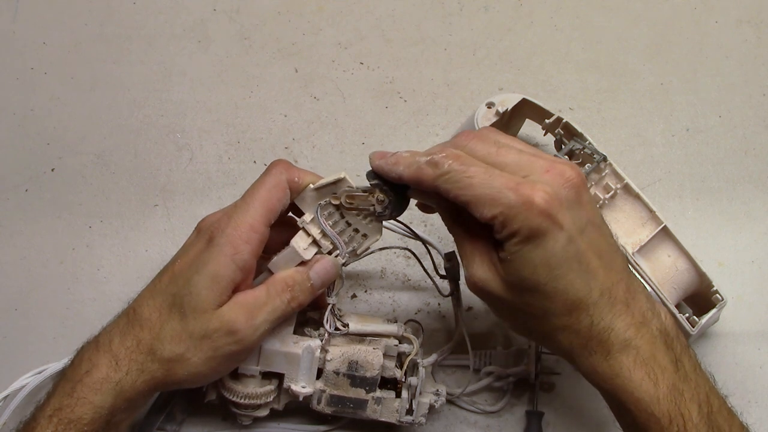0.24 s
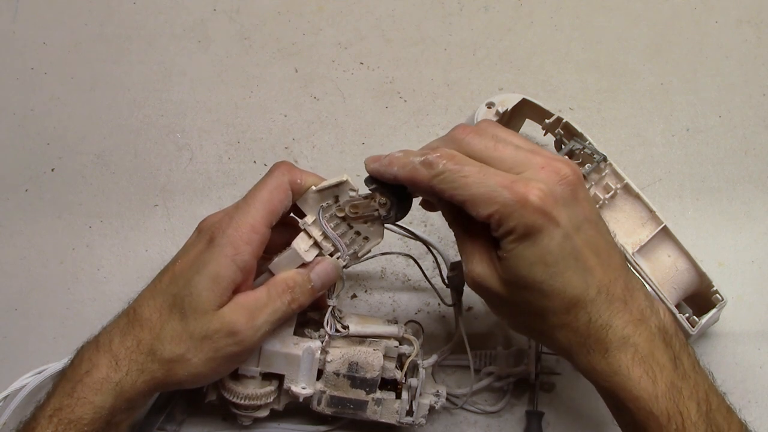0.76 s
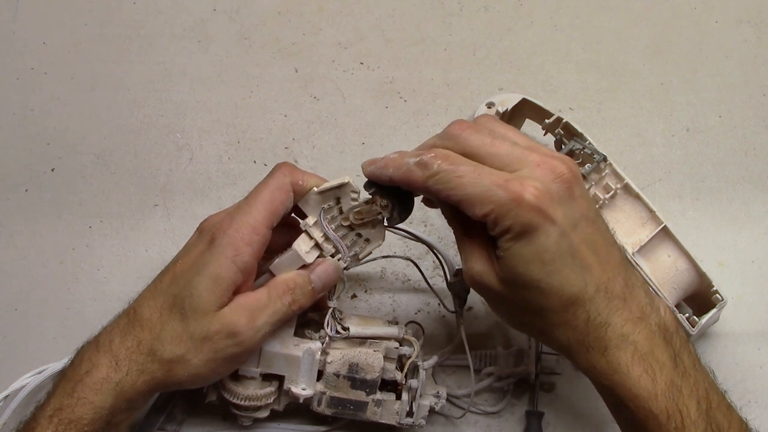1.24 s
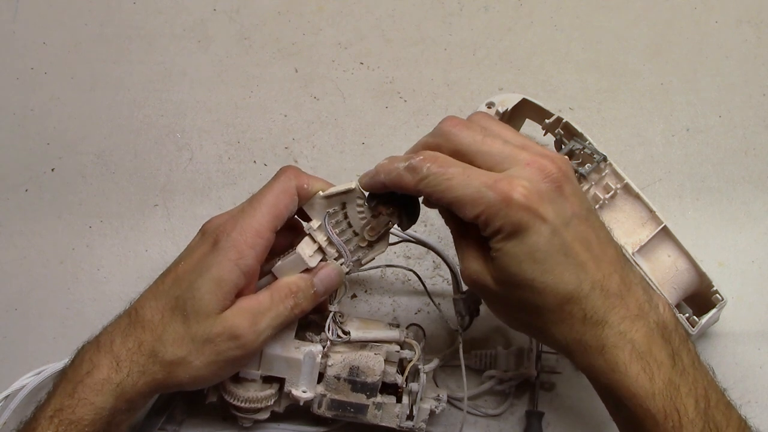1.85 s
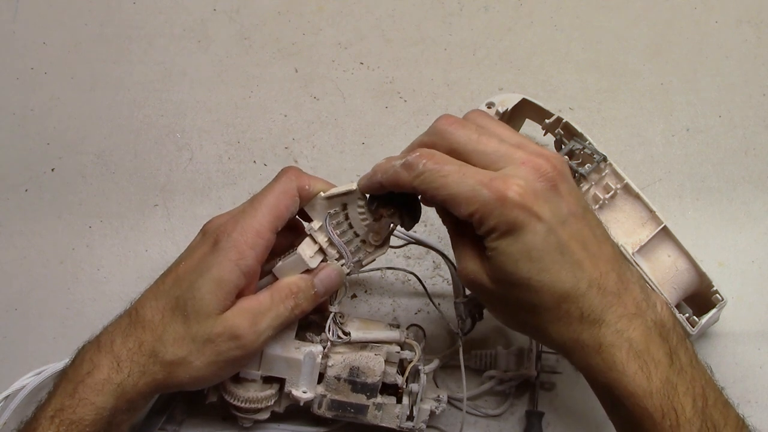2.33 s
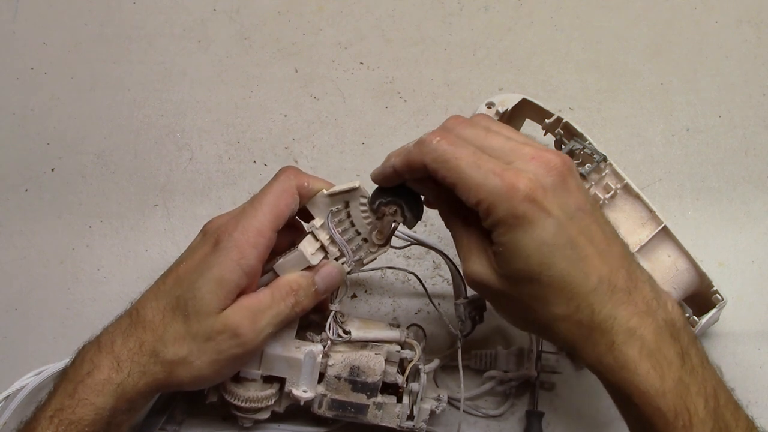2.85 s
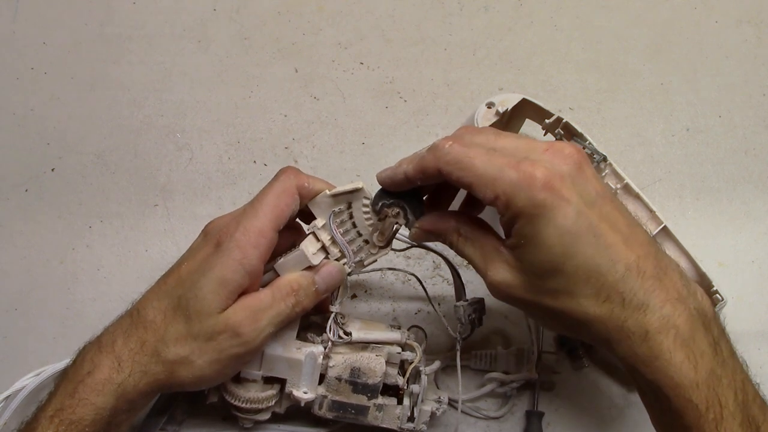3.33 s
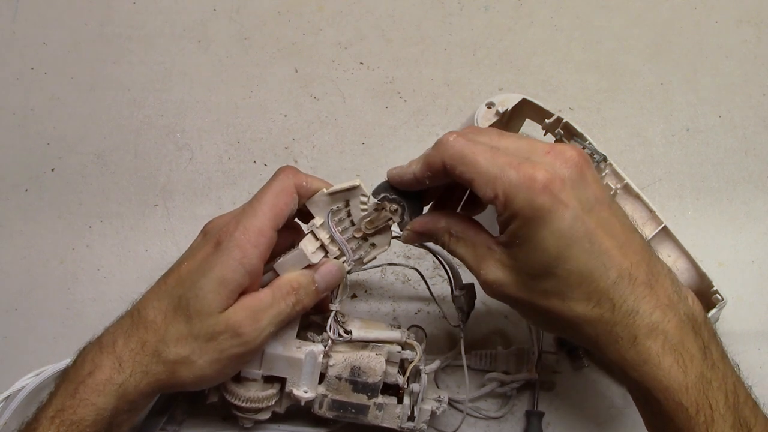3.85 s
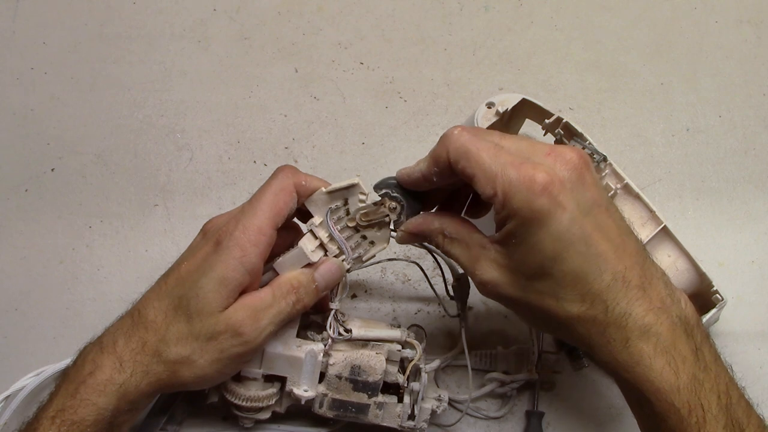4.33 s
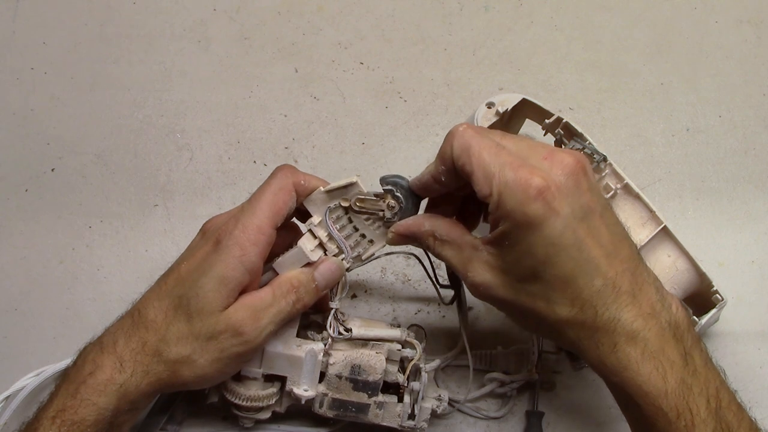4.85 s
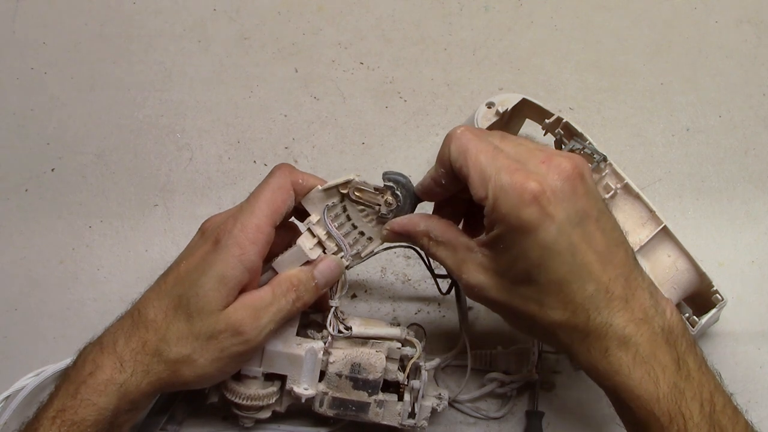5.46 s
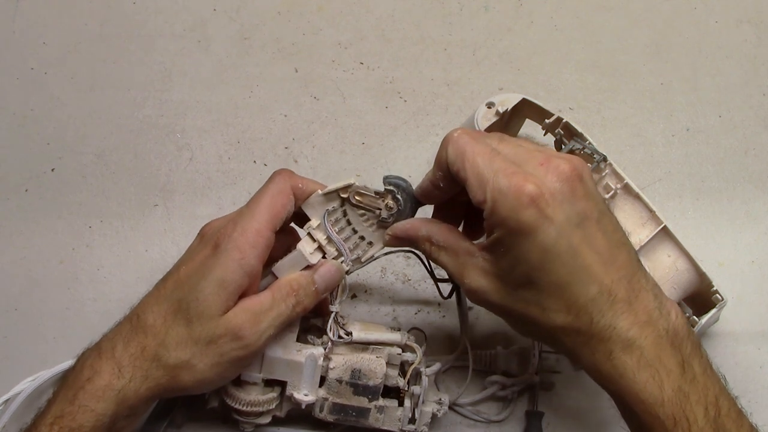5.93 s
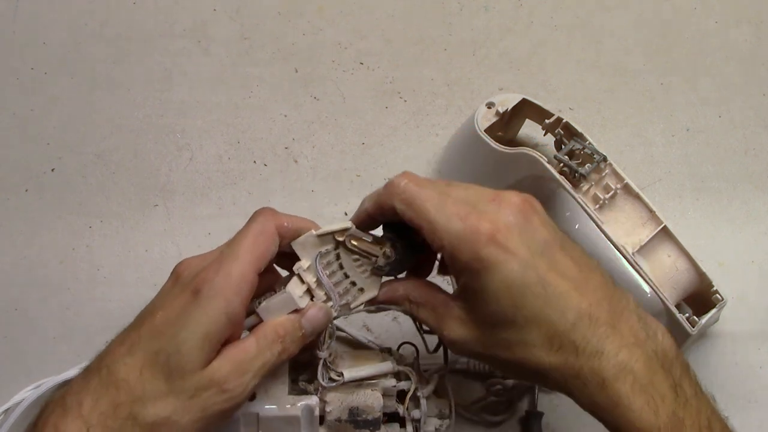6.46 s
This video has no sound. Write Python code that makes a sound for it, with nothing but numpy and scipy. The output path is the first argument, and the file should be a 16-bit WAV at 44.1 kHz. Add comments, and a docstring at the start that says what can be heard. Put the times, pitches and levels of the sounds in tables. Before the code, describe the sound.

Over the low, steady hum of a fan in a small room, a plastic selector knob clicks step by step near the microphone, some snaps crisp and slightly metallic, others barely there. A few dull bumps on a table fall between them. Toward the end come a faint squeak, hands rubbing on plastic and a cluster of knocks, one much louder than the rest, before a last light click.

```python
"""A blender's plastic rotary switch, turned by hand close to the microphone, over a work table.
Its sprung wiper scrapes over the contacts and snaps into each detent; the knob ticks and faintly squeaks.
Farther off, the opened base knocks on the table, once hard, and hands brush its housing.
A fan hums in the small room. Two closely spaced capsules give a nearly mono image."""
import sys
import numpy as np
from scipy import signal
from scipy.fft import rfft, irfft
from scipy.io import wavfile
from scipy.ndimage import uniform_filter1d

SR = 44100
rng = np.random.default_rng(int(sys.argv[2]) if len(sys.argv) > 2 else 0)


def transcribe(signal):
    """Save signal, clipped to [-1, 1], as a 16-bit WAV file at the path in sys.argv[1]."""
    frames = np.atleast_2d(signal).T
    limited = np.clip(frames, -1, 1)
    pcm = np.round(limited * 32767).astype(np.int16)
    wavfile.write(sys.argv[1], SR, pcm)


N = 294756
EVENT_T = np.arange(round(.3 * SR)) / SR  # time axis of one short sound, in seconds


def gain_of(db):
    """Decibels to gain."""
    return 10 ** (np.asarray(db) / 20)


def unit_rms(x, size=None):
    """Scales to rms 1 over the first size samples."""
    return x / np.sqrt(np.mean(x[..., :size] ** 2) + 1e-20)


def value_at(points, hz):
    """Reads a table on a log-frequency axis."""
    f, value = np.transpose(points)
    return np.interp(np.log(hz + 1), np.log(f + 1), value)


def add(mix, s, sound):
    """Adds a sound at s seconds."""
    part = mix[max(round(s * SR), 0):][:len(sound)]
    part += sound[:len(part)]


def coloured(x, colour):
    """Gives x a spectrum, at rms 1."""
    gains = gain_of(value_at(colour, np.fft.rfftfreq(len(x), 1 / SR)))
    return unit_rms(irfft(rfft(x) * gains, len(x)))


def band(x, lo_hz, hi_hz):
    """Causal band-pass, at rms 1."""
    return unit_rms(signal.sosfilt(signal.butter(2, [lo_hz, hi_hz], "band", fs=SR, output="sos"), x))


def noise(size=len(EVENT_T)):
    """White noise."""
    return rng.standard_normal(size)


def decay(t60):
    """Falls 60 dB in t60 seconds."""
    return np.exp(-np.log(1000) * EVENT_T / t60)


def ring(modes, detune, weight_db=lambda hz: 0, in_step=False):
    """Struck modes, slightly shifted from blow to blow; they start in step or with alternating sign."""
    out = 0
    for k, (hz, db, t60) in enumerate(modes):
        sign = 1 if in_step else (-1) ** k
        shifted_hz = hz * (1 + detune * rng.uniform(-0.92, 1))
        out += sign * gain_of(db + weight_db(hz)) * decay(t60) * np.sin(2 * np.pi * shifted_hz * EVENT_T)
    return out


def friction(size, grains_per_s, smooth):
    """Tiny slips of uneven size over a smooth hiss."""
    return noise(size) * (smooth + (rng.random(size) < grains_per_s / SR))


def uneven(size, depth_db):
    """A gain that wanders within some 10 ms, as friction grips and gives."""
    return gain_of(depth_db * unit_rms(uniform_filter1d(noise(size), size=400)))


# The fan's rush of air. Each row: frequency in Hz, relative level in dB.
FAN_AIR = [(20, -29), (45, -11.5), (110, -9.5), (300, -7), (480, -8.5), (700, -13), (900, -13.5),
           (1120, -16), (1600, -14), (2100, -19), (2700, -22), (4500, -24.5), (8000, -28), (16000, -40.5)]
# Its hum and faint motor whine. Each row: frequency in Hz, rms level in dB.
FAN_TONES = [(118, -71.5), (176, -71.5), (236.5, -62.5), (356, -69.5), (410.5, -64), (530, -76),
             (588, -67.5), (705, -75.5), (764.4, -72.5), (823, -74), (942, -71.5), (1357, -75),
             (1529, -71.5), (2062, -71.5), (2180, -76), (2945, -79), (3060, -71.5), (5475, -79.5),
             (5943, -77.5), (7181, -91), (7418, -81), (7827, -92), (8240, -82), (10239, -84.5)]
def fan():
    """A fan in the background of the room: rushing air and slightly wavering tones."""
    t = np.arange(N) / SR
    out = gain_of(-55.5) * coloured(noise(N), FAN_AIR)
    for hz, db in FAN_TONES:
        width_hz = 0.48 + hz * 0.0029
        drift = np.cumsum(noise(N)) * np.sqrt(2 * np.pi * width_hz / SR)
        out += gain_of(db) * np.sqrt(2) * np.sin(2 * np.pi * hz * t + uniform_filter1d(drift, size=200))
    return out


# Modes of the switch body and wiper spring. Each row: frequency in Hz, relative level in dB, t60 in seconds.
BODY_MODES = [(1450, -5.5, 0.011), (1986, -13.5, 0.041), (2415, 4.5, 0.019), (2680, 2.5, 0.011),
              (3110, 1.5, 0.025), (3590, -0.5, 0.034), (3680, 6, 0.012), (4300, -36, 0.0043)]
SPRING_MODES = [(4950, 6, 0.0063), (6300, 1, 0.012), (7380, -3.5, 0.032), (8790, -0.5, 0.02),
                (9020, -4, 0.0084), (10400, 0.5, 0.0057), (11050, -19, 0.0067), (13300, -6, .012)]
# The metal tick, heard close. Each row: frequency in Hz, relative level in dB.
TICK_COLOUR = [(200, -43), (900, 5.5), (1700, 0), (2600, 3), (4500, 9.5), (5600, -10.5), (8300, 5.5),
               (10500, 5), (12000, -19), (13500, -12), (16000, -16)]
def snap(body_db, tick_db, hz):
    """One sharp tap and a few ms of chatter ring the wiper spring and the plastic body."""
    attack = round(.004 * SR)
    tap = unit_rms(coloured(signal.unit_impulse(len(EVENT_T), idx=8), TICK_COLOUR), attack)
    body = ring(BODY_MODES, detune=0.04, weight_db=lambda f: -13 * min(abs(f - hz) / 900, 1))
    spring = unit_rms(ring(SPRING_MODES, detune=0.023), attack)
    chatter = unit_rms(coloured(noise(), TICK_COLOUR) * (decay(0.019) + .09 * decay(.08)), attack)
    # a duller, later wash of nearby reflections follows the snap
    wash = band(noise(), 600, 2800) * (decay(0.21) - decay(0.069))
    body_and_wash = unit_rms(body, attack) + 0.065 * unit_rms(wash, 5 * attack)
    metal = 0.33 * tap + 0.48 * spring + 0.52 * chatter
    return gain_of(body_db) * body_and_wash + gain_of(tick_db) * metal


# Small ticks at the microphone. Each row: start in seconds, level in dB, favoured ring in Hz.
STRAIN_TICKS = [(0.304, -52, 2730), (0.5447, -53, 3720), (.69, -53, 2610), (0.7282, -43, 2840),
                (2.083, -47.5, 2900), (2.228, -44.5, 2340), (4.757, -52.5, 2850), (5.125, -53.5, 2590)]
def strain_ticks(spring_db=-18):
    """The plastic ticks under strain; little of it reaches the spring."""
    out = np.zeros(N)
    for s, db, hz in STRAIN_TICKS:
        add(out, s, snap(db, db + spring_db, hz))
    return out


# The wiper on its contacts, heard close. Each row: frequency in Hz, relative level in dB.
WIPER_COLOUR = [(200, -11), (900, 1), (1900, -23), (2500, 6.5), (3500, -0.5), (4600, -5.5), (6300, -7.5),
                (7700, 2.5), (8600, -5.5), (9400, -11), (11300, -5.5), (12500, -19), (16000, -21)]
def wiper_scrape(run_up_s, swell_db=17, release_t60=0.051):
    """The wiper scrapes harder as it runs down toward a detent, then comes to rest."""
    t = EVENT_T - run_up_s
    push = gain_of(np.minimum(swell_db * t / run_up_s, -60 * t / release_t60))
    push *= uneven(len(t), depth_db=0.3)
    return push * coloured(friction(len(t), 2500, smooth=0.31), WIPER_COLOUR)


# Steps of the switch. Each row: snap time in seconds, body level in dB, metal tick in dB, favoured ring
# in Hz, scrape in dB, run-up in seconds, second touch's offset in seconds, its gain in dB.
DETENTS = [(0.405, -33.5, -34, 3130, -40.5, 0.024, -0.017, -11),
           (.889, -47.5, -46, 3360, -46, 0.028, -0.0076, -2),
           (1.352, -39.5, -39.5, 3030, -46, .03, -0.0077, -5),
           (1.7597, -35, -35.5, 2940, -48.5, 0.053, 0.00091, -24),
           (2.331, -54, -64, 2980, -53, 0.048, 0.0092, -6), (3.103, -79, -55, 2970, -58, 0.034, .02, 2),
           (3.4156, -46, -47.5, 2610, -51.5, .045, 0.011, 0),
           (3.728, -45, -39.5, 2680, -50, 0.038, 0.012, -5),
           (4.1143, -47, -41, 3160, -52.5, .055, .0159, -5.5),
           (4.4899, -45, -52, 3000, -54, .085, -.037, -9),
           (4.843, -31, -34, 2700, -47.5, 0.039, -0.007, -16),
           (5.1691, -32.5, -36, 2570, -55, 0.089, -0.0067, -9),
           (6.6382, -55, -43.5, 2960, -48, 0.011, 0.025, 4)]
def detents(rebound_hz=3460):
    """The wiper scrapes and snaps into each detent, catching just before or rebounding just after."""
    out = np.zeros(N)
    for s, body_db, tick_db, hz, scrape_db, run_up_s, offset_s, touch_db in DETENTS:
        add(out, s - run_up_s, gain_of(scrape_db) * wiper_scrape(run_up_s))
        add(out, s, snap(body_db, tick_db, hz))
        if offset_s < 0:  # a catch rings the body less
            touch = snap(body_db - 2.5, tick_db, hz)
        else:  # a rebound has more plastic, less metal, and rings higher
            touch = snap(body_db + 1, tick_db - 6, rebound_hz)
        add(out, s + offset_s, gain_of(touch_db) * touch)
    return out


# Modes of the base on the work table, of its hollow housing and of its stiff edges.
# Each row: frequency in Hz, relative level in dB, t60 in seconds.
TABLE_MODES = [(152.2, -6, 0.34), (225.3, -4.5, 0.18), (286.8, 0, .14), (343.3, 5, 0.082), (383, -9, 0.15),
               (434, -1.5, 0.15), (512, -7, 0.14), (571, -4, 0.15)]
HOUSING_MODES = [(680, -4, .09), (765, -2, .06), (935, -6, .13), (1002, -5, .12), (1140, 2, .14),
                 (1274, -4, .1), (1530, -6, .1), (1595, -6, .09), (1760, -9, .09), (1915, -8, .08),
                 (2020, -8, .08)]
EDGE_MODES = [(2460, -6, .07), (2610, -5, .11), (2768, -1, .11), (2930, -1, .09), (3490, -2, .07),
              (3525, -2, .09), (3880, -.5, .08), (4120, -1, .08), (4545, -6, .08), (4841, -1, .1),
              (5090, -6, .08), (5330, -9, .09), (5960, -13, .09), (6520, -10, .07), (7010, -11, .09)]
# The rattle of those edges. Each row: frequency in Hz, relative level in dB.
RATTLE_COLOUR = [(1200, -50), (2200, 2.5), (3200, 3), (4000, 4.5), (5200, -9), (5900, -7), (7900, -9.5),
                 (10000, -18.5), (13000, -25), (16000, -36)]
def blow(thud_db, clack_db, crack_db, hz):
    """A blow sets the table thudding and the housing clacking; hard edges rattle for some 10 ms."""
    attack = round(.02 * SR)
    rise_s = .0003 if clack_db > thud_db - 14 else .003  # padded nudges build up slowly
    onset = -np.expm1(-EVENT_T / rise_s)
    # where the base is pushed decides which of its modes answer
    thud = ring(TABLE_MODES, detune=0.01, weight_db=lambda f: -12 * abs(np.log2(f / hz)), in_step=True)
    thud *= -np.expm1(-EVENT_T / 0.0022)  # its mass takes a cycle to get moving
    rumble = band(noise(), 184, 500) * decay(0.34)
    thud = unit_rms(thud, attack) + .2 * unit_rms(rumble, attack)
    # small loose parts hardly move the table, and ring higher
    tilt_db = 1.1 * max(clack_db - thud_db + 8, 0)
    housing = ring(HOUSING_MODES, detune=0.0011, weight_db=lambda f: tilt_db * np.log2(f / 1000))
    burst = band(noise(), 590, 1620) * decay(0.073)
    clack = unit_rms(housing, attack) + 1.66 * unit_rms(burst, attack)
    edges = ring(EDGE_MODES, detune=0.0014)
    rattle = coloured(noise(), RATTLE_COLOUR) * (1 / (1 + (EVENT_T / 0.0061) ** 4) + .11 * decay(0.12))
    crack = 0.7 * unit_rms(edges, attack) + unit_rms(rattle, attack)
    parts = (thud_db, thud), (clack_db, clack), (crack_db, crack)
    return sum(gain_of(db) * unit_rms(part * onset, attack) for db, part in parts)


# Bumps of the base, farther from the microphone. Each row: start in seconds, table thud in dB, housing
# clack in dB, edge crack in dB, favoured thud in Hz, second foot's delay in seconds, its gain in dB.
KNOCKS = [(1.371, -37.5, -42, -63, 323, 0.022, -15), (1.784, -48.5, -72, -69, 267, 0.017, -18),
          (2.361, -49, -58, -71, 255, 0.013, -23), (3.255, -47.5, -60.5, -65, 277, .0175, -1),
          (3.7851, -61, -52.5, -59, 330, .0175, -16), (5.941, -36.5, -43, -54, 507, 0.011, -27),
          (5.949, -37, -39, -50.5, 535, 0.016, -6), (6.097, -41.5, -64, -60, 288, .024, -10),
          (6.211, -14.5, -24.5, -24, 340, .0145, -24), (6.2536, -41, -42, -43, 425, 0.025, -16),
          (6.351, -36, -49.5, -68, 298, 0.019, -15), (6.515, -40, -55, -70, 338, .035, -11),
          (6.6064, -30, -44.5, -51, 310, 0.018, -0.5), (6.653, -37, -48, -60, 280, .0175, -17)]
def knocks():
    """The base lands on one foot, then more dully on a second."""
    out = np.zeros(N)
    for s, thud_db, clack_db, crack_db, hz, delay_s, second_db in KNOCKS:
        add(out, s, blow(thud_db, clack_db, crack_db, hz))
        add(out, s + delay_s, gain_of(second_db) * blow(thud_db, clack_db - 2, crack_db - 10, hz))
    return out


def finger_ticks(count=10, start_s=2.1, end_s=4.8, db=-56, spread_db=4.5):
    """Fingers shift on the knob with a scatter of faint, dull ticks."""
    out, attack = np.zeros(N), round(.004 * SR)
    for k, (late, strength) in enumerate(rng.random((count, 2))):
        tick = unit_rms(band(noise(), 1290, 2370) * decay(0.029), attack)
        level = gain_of(db + spread_db * (2 * strength - 1))
        add(out, start_s + (end_s - start_s) * (k + late) / count, level * tick)
    return out


def wiper_creep(start_s=2.73, end_s=3.07, db=-66):
    """The wiper creeps over a contact as the turn reverses: a faint scrape that swells and fades."""
    progress = np.clip((np.arange(N) / SR - start_s) / (end_s - start_s), 0, 1)
    return gain_of(db) * np.sin(np.pi * progress) * coloured(friction(N, 2500, smooth=.27), WIPER_COLOUR)


# The knob creeping on its shaft, close by. Each row: start in seconds, length in seconds, level in dB,
# level change over the squeak in dB, starting pitch in Hz.
SQUEAKS = [(5.1727, .068, -41, -9, 3780), (5.916, .17, -53, 0.5, 3810)]
def squeaks(max_slips=16, slip_s=.0135, jitter=.25, spread_db=2.5, pitch_sag=0.045):
    """The knob sticks and slips in short rasps that excite one narrow resonance, sagging as it eases."""
    out, t = np.zeros(N), EVENT_T - EVENT_T[-1] / 2
    for start, length, db, change_db, top_hz in SQUEAKS:
        for k, (late, strength) in enumerate(rng.uniform(-1, 1, (max_slips, 2))):
            grains = friction(len(t), 2400, smooth=0.3)
            delay = slip_s * (k + jitter * late)
            if delay < length:
                hz = top_hz * (1 - pitch_sag * delay / length)
                rasp = band(grains, .95 * hz, 1.05 * hz) + 0.64 * band(grains, 510, 3800)
                level = gain_of(db + change_db * delay / length + spread_db * strength)
                add(out, start + delay + t[0], level * rasp * np.exp(-abs(t) / 0.004))
    return out


# Skin on plastic, as a soft rub and as a gritty scrape. Each row: frequency in Hz, relative level in dB.
RUB_COLOUR = [(150, -2.5), (300, 11), (800, -3.5), (1600, -5.5), (2500, -12.5), (4000, -15), (7000, -24),
              (16000, -45)]
GRIT_COLOUR = [(800, -9), (1500, 2.5), (3300, 5), (4600, -1), (5000, -2), (5500, -3), (7500, -2.5),
               (11000, -11), (16000, -23)]
# Strokes over the housing, back at the base. Each row: start and end in seconds, rub and grit in dB.
STROKES = [(5.853, 6.005, -45, -71), (5.995, 6.118, -45.5, -61), (6.133, 6.233, -42, -44.5),
           (6.22, 6.336, -45, -60.5), (6.357, 6.436, -45.5, -51.5), (6.471, 6.603, -48.5, -60),
           (6.587, 6.661, -50, -56)]
def hand_brush(attack_s=0.017, swell_db=7.5, release_t60=0.17):
    """A hand rubs the housing in uneven little pulls, pressing harder until it lets go."""
    t, rub, grit = np.arange(N) / SR, 0, 0
    for start, end, rub_db, grit_db in STROKES:
        press_db = np.minimum(swell_db * (t - end) / (end - start), -60 * (t - end) / release_t60)
        press = np.clip((t - start) / attack_s, 0, 1) * gain_of(press_db)
        rub += gain_of(rub_db) * press
        grit += gain_of(grit_db) * press
    rub *= coloured(friction(N, 1800, smooth=0.23), RUB_COLOUR)
    grit *= coloured(friction(N, 1500, smooth=0.47), GRIT_COLOUR)
    return uneven(N, depth_db=1.7) * (rub + grit)


# The base rocking on the table. Each row: frequency in Hz, relative level in dB, t60 in seconds.
ROCKING_MODES = [(82, 0.5, 0.227), (143.4, -4, 0.26)]
def settle(start_s=6.256, db=-28.5, rise_s=0.032):
    """After the hard knock the heavy base rocks softly back onto its feet."""
    out = np.zeros(N)
    rocking = ring(ROCKING_MODES, detune=.005, in_step=True) * (1 - decay(rise_s))
    add(out, start_s, gain_of(db) * rocking)
    return out


# The small room around the table. Each row: frequency in Hz, t60 in seconds.
ROOM_T60 = [(200, 0.14), (1200, 0.17), (3500, 0.12), (8000, 0.11), (15000, 0.087)]
# Its reflections at the microphone. Each row: frequency in Hz, relative level in dB.
ROOM_COLOUR = [(100, -23), (400, -0.5), (1500, 4.5), (3000, 0), (8000, 2.5), (16000, 0.5)]
def room(x, wet_db, delay_s):
    """Dense reflections fade in behind the direct sound; the treble dies first."""
    hz, t, spectrum = signal.stft(noise(), SR, nperseg=256)
    spectrum *= gain_of(value_at(ROOM_COLOUR, hz))[:, None]
    spectrum *= np.exp(-np.log(1000) * t / value_at(ROOM_T60, hz)[:, None])
    tail = signal.istft(spectrum, SR, nperseg=256)[1][:len(EVENT_T)]
    tail *= np.clip(EVENT_T / delay_s - 1, 0, 1)
    return x + gain_of(wet_db) * signal.fftconvolve(x, tail / np.linalg.norm(tail))[:N]


# The capsules' own hiss. Each row: frequency in Hz, relative level in dB.
CAPSULE_HISS = [(30, -4), (300, 10.5), (1000, 4), (2500, -2), (6000, -9.5), (11000, -17), (13000, -39)]
def microphone(mid):
    """Two closely spaced capsules differ by the slope of the pressure, and by their own hiss."""
    side = gain_of(-19) * np.gradient(mid) + gain_of(-64) * coloured(noise(N), CAPSULE_HISS)
    return np.array([gain_of(1.18) * mid + side, gain_of(0.96) * mid - side])


def scene():
    """The switch is held near the microphone, the base lies farther off, the fan runs throughout."""
    switch = detents() + wiper_creep() + strain_ticks() + finger_ticks() + squeaks()
    near = room(switch, wet_db=-13.0, delay_s=0.00079)
    far = room(knocks() + hand_brush(), wet_db=-12.5, delay_s=0.0042) + settle()
    return microphone(near + far + fan())


def record(dry, low_cut_hz=50, top_hz=16000):
    """The recorder drops the deepest bass and limits the band."""
    thin = signal.sosfilt(signal.butter(2, low_cut_hz, "high", fs=SR, output="sos"), dry)
    low_pass = signal.firwin(401, top_hz, window=("kaiser", 9), fs=SR)
    return signal.oaconvolve(thin, low_pass[None], "same")


dry = scene()
out = record(dry)
transcribe(out)
```